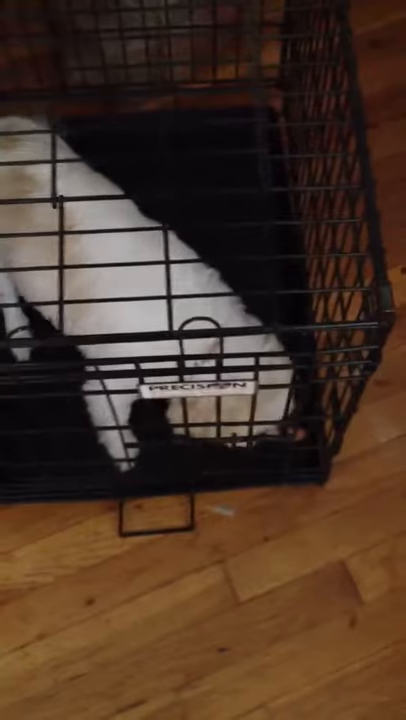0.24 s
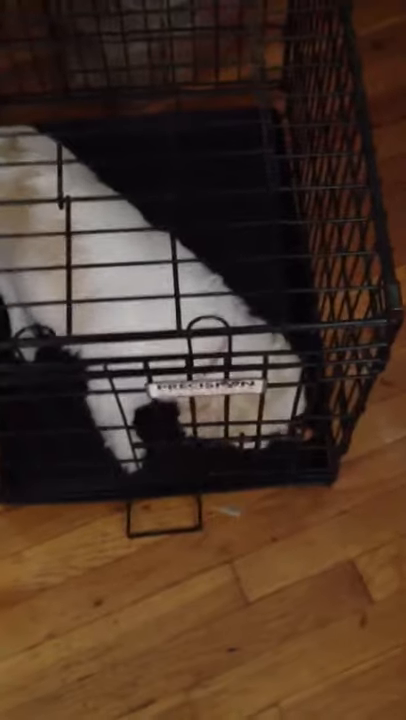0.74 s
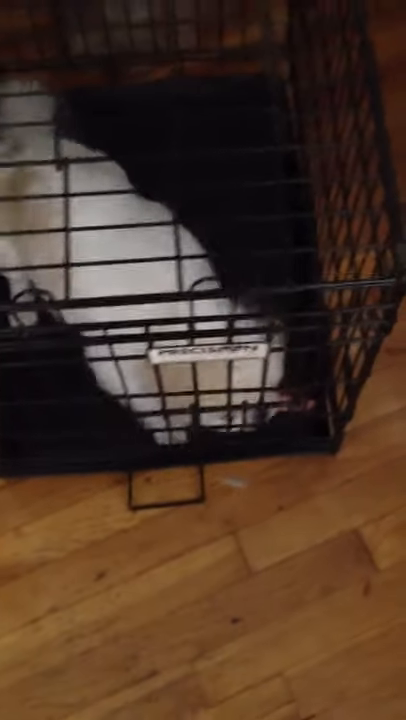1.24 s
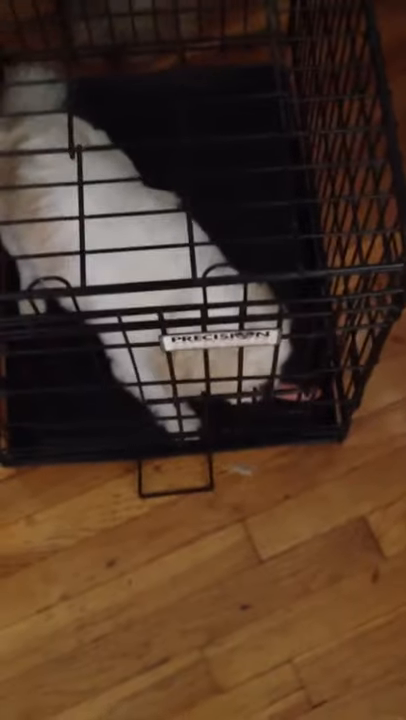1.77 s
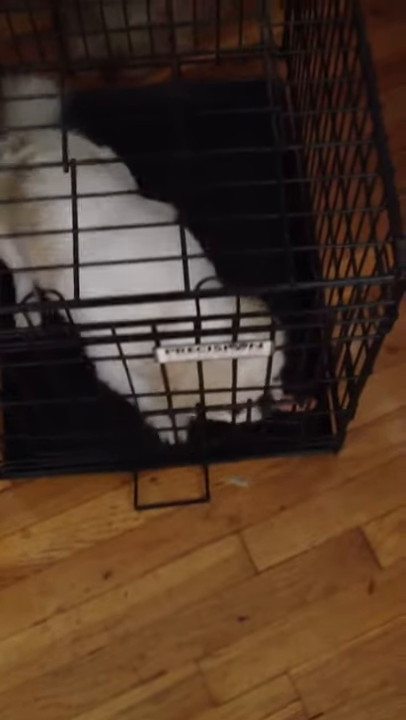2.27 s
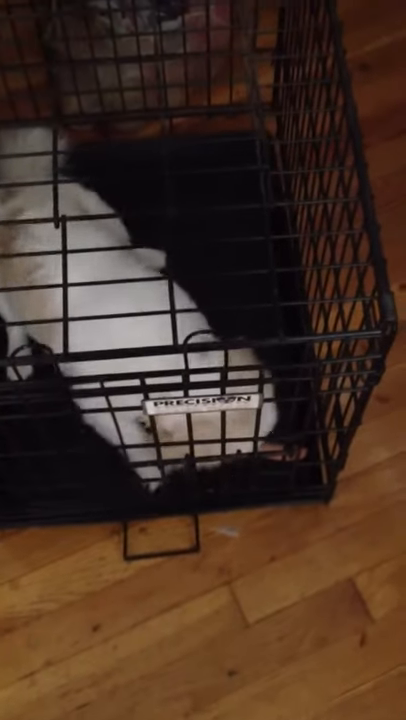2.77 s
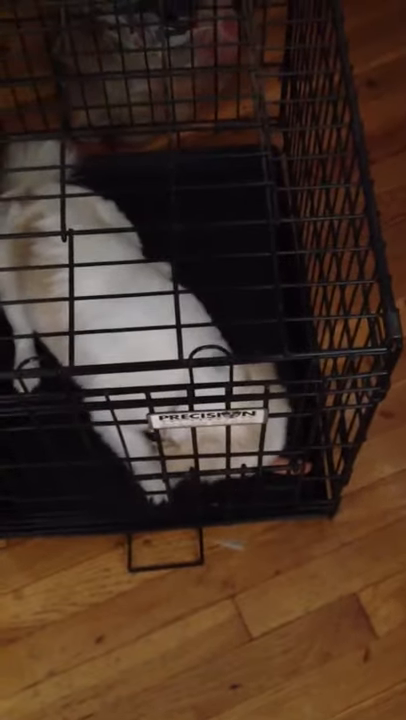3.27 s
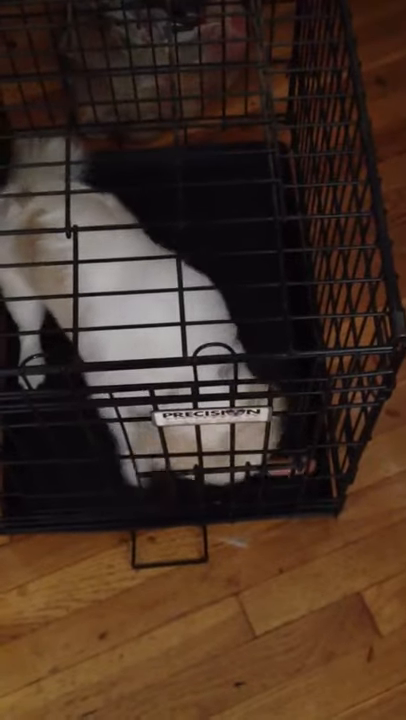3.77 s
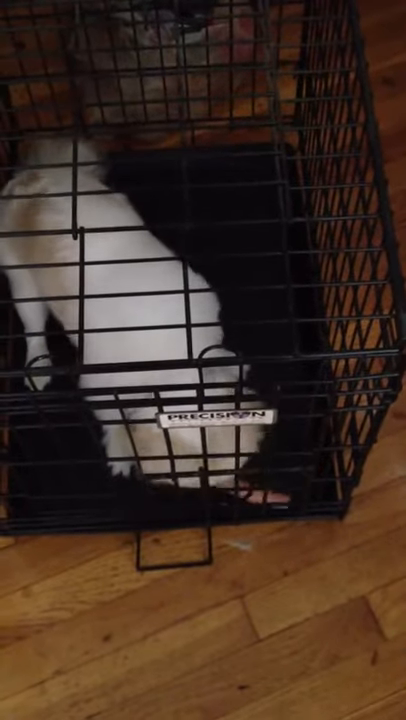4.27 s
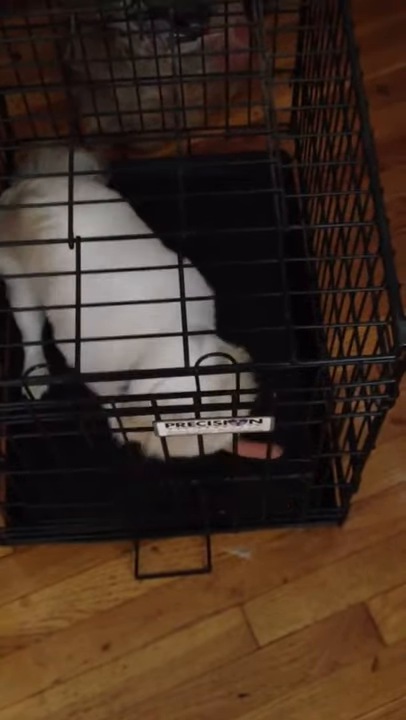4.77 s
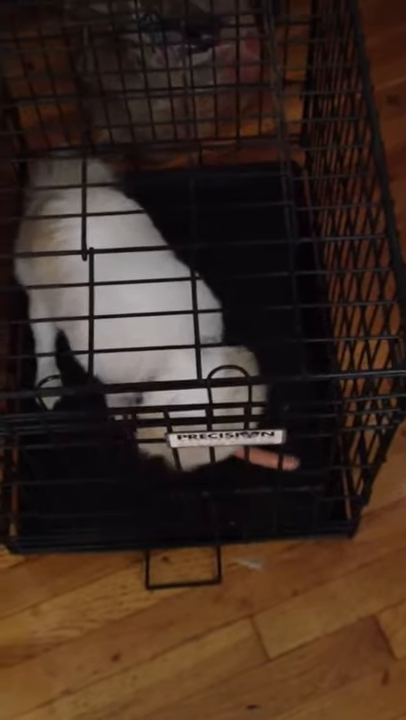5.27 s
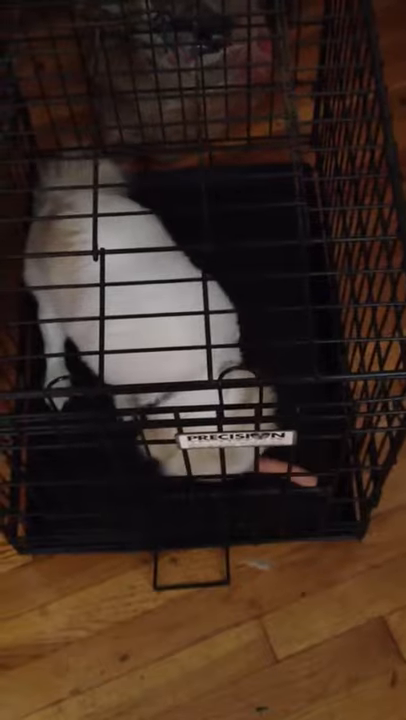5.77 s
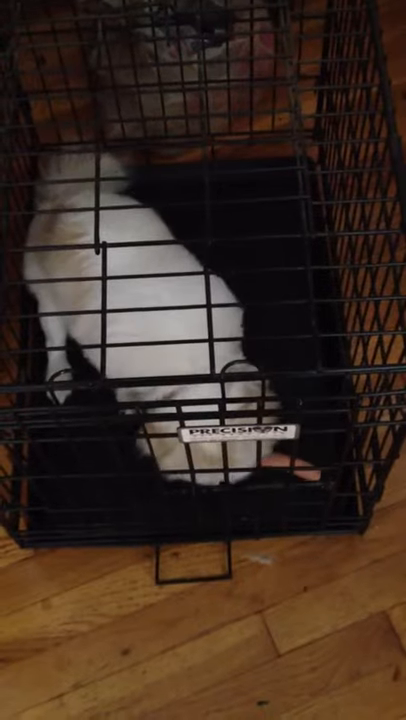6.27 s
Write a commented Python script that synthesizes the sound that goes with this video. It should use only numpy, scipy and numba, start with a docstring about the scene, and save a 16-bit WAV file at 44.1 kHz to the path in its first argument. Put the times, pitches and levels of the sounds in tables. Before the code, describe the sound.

A small dog guards a treat in a crate in a small, lively room, heard from a metre or two on a phone. A short hoarse rasp at 0 s leads into a wet, fluttering in-drawn snarl with throat rattle until about 0.8 s. A loud, harsh bark bursts at 0.95 s, with a weaker one at 1.15 s, trailing into rasps. A second hissing snarl runs from 1.6 to 2.1 s, then raw barks hit at 2.15 and 2.55 s with hoarse rasping between and after. A softer snarl at 2.9-3.4 s tightens into a low growl and a final strong bark at 3.6 s. Two crunches come around 3.9 s while the low growl pulses in surges until about 4.6 s. From 4.9 s to the end at 6.5 s there are only sparse, quiet bites, knocks and tooth ticks over faint room hush.

```python
"""A small dog guards a treat in a wire crate on a wooden floor, a metre or two from a phone.
It opens with a hoarse rasp and an in-drawn snarl: air past the teeth, a fluttering palate, a throat rattle.
Harsh barks follow, with rasps and snarls between: chaotic folds drive resonances that rise with the jaw.
Around the last bark a low growl of slack pulses surges; then bites crunch on jaw, teeth and tray.
A small room rings behind the dog, a faint hush lies under it all, and the phone limits the peaks."""
import sys
import numpy as np
from scipy import signal
from scipy.fft import rfft, irfft
from scipy.io import wavfile
from scipy.ndimage import uniform_filter1d, minimum_filter1d
from numba import njit

SR = 44100
rng = np.random.default_rng(int(sys.argv[2]) if len(sys.argv) > 2 else 0)


def generate_wav(signal):
    """Clip the signal to [-1, 1] and save it as 16-bit WAV at the path in sys.argv[1]."""
    frames = np.transpose(np.atleast_2d(signal))
    scaled = np.clip(frames, -1, 1) * 32767
    pcm = np.round(scaled).astype(np.int16)
    wavfile.write(sys.argv[1], SR, pcm)


N = 287091
T = np.arange(N) / SR
SLOW = np.arange(0, N / SR, .001)  # control clock [s]
GRID = np.fft.rfftfreq(8192, 1 / SR)  # filter frequencies [Hz]

# Barks, levels before the final trim; resonances with the jaw open, drifting about mid-hold:
# (start [s], jaw opening [s], jaw held open [s], level [dB], sag [dB/s], first resonance [Hz],
#  second [Hz], its drift [Hz/s], third [Hz], its drift [Hz/s], edge re mouth [dB], edge growth [dB/s],
#  hiss [dB], chest [dB], opening thump [dB])
BARKS = [ (0.952, 0.055, 0.045, -9, -12.5, 1317, 2020, -0.5, 3200, 1500.5, -11, -11.5, -31, -33, -27),
         (1.151, 0.11, 0.011, -18.5, 5, 1320, 1900, 0, 3030, 0, -4.5, -70, -34, -36.5, -65),
         (2.15, 0.034, 0.048, -9.5, 5, 1260, 2036, 3500.5, 3074, -7000, -12.5, 130.5, -32.5, -32, -30.5),
         (2.555, .058, 0.086, -13, 58.5, 1394, 2220, 10000, 3326, 5001, -10, 50.5, -33.5, -36.5, -45),
         (3.608, 0.058, 0.024, -8, 71, 1250, 1620, 0, 2915, -3, -22.5, -20.5, -34, -33.5, -31.5), ]
# Hoarse rasps around the barks, last three levels relative to the mouth:
# (start [s], length [s], level [dB], first resonance [Hz], second [Hz], third [Hz],
#  chest [dB], edge [dB], hiss [dB])
RASPS = [ (0.0, .03, -34, 710, 1863, 3370, -3.5, -7.5, -5.5),
         (0.099, .03, -49.5, 772, 1710, 3345, -4, -14, -5.5),
         (1.12, 0.062, -37, 1080, 1863, 2920, -28, 1, -8),
         (1.284, .09, -33.5, 790, 1856, 3230, -3, -13, -10),
         (1.383, .035, -47, 752, 1950, 3065, -0.5, -2, -7),
         (1.515, .05, -54, 1019, 1720, 3020, -5.5, -13, -10),
         (2.299, .11, -36, 868, 1760, 3100, -4, -8.5, -14.5),
         (2.42, .135, -36.5, 1037, 1710, 2933, -7, -10, -18),
         (2.78, .06, -51, 1350, 1680, 2900, -18, -14, -13),
         (3.473, 0.023, -49.5, 857, 1466, 2856, -3, -27, -24), ]
# Chest resonances: (frequency [Hz], width [Hz], level [dB])
CHEST = [(145, 10, -11.5), (224.3, 90, 1.5), (331, 120, 3.5), (551, 120, 4.5)]
# Air past the teeth: (frequency [Hz], width [Hz], level [dB])
BARK_HISS = [(7770, 2700, 1.5), (11700, 5300, -5)]


def barks():
    """Chaotic folds drive resonances that rise as the jaw opens; force widens them and adds edge and hiss."""
    gestures = [bark(*row) for row in BARKS] + [rasp(*row) for row in RASPS]
    loud, chesty, edgy, airy, first_hz, second_hz, third_hz = one_throat(gestures)
    force = np.clip(loud * undb(16), 0, 1)
    voice = folds(hz=145, jitter=.2, shimmer_db=2, air_db=1.5, puff=.7)
    scream = folds(hz=316, jitter=.06, shimmer_db=2.3, air_db=-6, puff=.4)
    # under force a second, tighter vibration joins the slow one
    strained = unit(voice) + force * undb(2.5) * unit(scream)

    gape = 1 + 0.79 * force  # an open mouth damps its resonances
    first = formant(strained, first_hz, width_hz=480 * gape)
    second = formant(strained, second_hz, width_hz=380 * gape)
    third = formant(strained, third_hz, width_hz=620 * gape)
    fourth = formant(strained, 1.42 * third_hz, width_hz=570)
    body = unit(resonate(strained, [(842, 200, 0)]))
    mouth = steady(first - undb(-1.0) * second + undb(-19.5) * body)

    chest = chesty * steady(resonate(voice, CHEST))
    edge = edgy * third + airy * undb(-6.0 + 6.1 * force) * fourth
    breath = unit(strained) + undb(1.5) * rng.standard_normal(N)
    hiss = airy * steady(resonate(breath, BARK_HISS))
    return undb(-2.5) * (loud * mouth + chest + edge + hiss)


VOICE_ATTACK_S, VOICE_RELEASE_S, BARK_TAIL_S = 0.0092, 0.074, 0.06  # the voice outlasts the open jaw
HISS_ATTACK_S, HISS_RELEASE_S = 0.031, 0.18
THUMP_S, THUMP_RELEASE_S = .02, .12  # the first push of air booms in the chest
# what shut jaws take from the mouth, and from the edge on top of that
JAW_CLOSE_S, MUFFLE_DB, EDGE_MUFFLE_DB = 0.03, 22, 7.5
# resonances with shut jaws, as shares of the open ones
SHUT_FIRST, SHUT_SECOND, SHUT_THIRD = 0.6, .9, 0.98


def bark(start, opening, hold, db, sag, first_hz, second_hz, second_drift, third_hz, third_drift,
         edge_db, growth, hiss_db, chest_db, thump_db):
    """The voice starts behind shut jaws; as they open it grows loud and bright and its resonances rise."""
    held = opening + hold
    still_shut = 1 - np.sin(np.pi / 2 * np.clip((SLOW - start) / opening, 0, 1))
    shut = still_shut + np.clip((SLOW - start - held) / JAW_CLOSE_S, 0, 1)
    age = np.clip(SLOW - start - opening, 0, hold) - hold / 2  # from mid-hold
    voiced = swell(start, held + BARK_TAIL_S, VOICE_ATTACK_S, VOICE_RELEASE_S)
    mouth = voiced * undb(db - sag * age - MUFFLE_DB * shut)
    thump = swell(start, THUMP_S, VOICE_ATTACK_S, THUMP_RELEASE_S) * undb(thump_db)
    chest = np.hypot(voiced * undb(chest_db), thump)
    edge = mouth * undb(edge_db + growth * age - EDGE_MUFFLE_DB * shut)
    hiss = swell(start, held, HISS_ATTACK_S, HISS_RELEASE_S) * undb(hiss_db - sag * age)
    first = first_hz * SHUT_FIRST ** shut
    second = (second_hz + second_drift * age) * SHUT_SECOND ** shut
    third = (third_hz + third_drift * age) * SHUT_THIRD ** shut
    return [mouth, chest, edge, hiss], [first, second, third]


def rasp(start, length, db, first_hz, second_hz, third_hz, chest_db, edge_db, hiss_db):
    """The same voice held at low effort, with the jaws still."""
    mouth = swell(start, length, VOICE_ATTACK_S, VOICE_RELEASE_S) * undb(db)
    levels = np.outer(undb([0, chest_db, edge_db, hiss_db]), mouth)
    return levels, np.outer([first_hz, second_hz, third_hz], np.ones(len(SLOW)))


# In-drawn snarls, levels before the layer weights and trim:
# (start [s], length [s], swell [s], teeth [dB], nose [dB], nose sag [dB/s], rattle [dB],
#  first resonance [Hz], its drift [Hz/s], second [Hz], third at the start [Hz], third with lips back [Hz])
SNARLS = [ (0.121, 0.65, 0.047, -42, -43, -7.5, -65.5, 953, -190, 2870, 3780, 4070),
          (1.574, 0.43, 0.027, -38.5, -40.5, 0, -68, 1222, -420, 2200, 3300, 4130),
          (2.88, 0.39, 0.095, -44, -46, 4, -75.5, 1297, 160, 2800, 3940, 3320), ]
# Palate flutter in the mouth, one list per snarl: (time [s], level [dB])
FLUTTERS = [
    [(0.11, -53.5), (0.276, -36), (0.298, -71), (0.308, -39.5), (0.538, -49.5), (0.668, -44.5),
     (0.904, -64.5), (0.93, -86)],
    [(1.57, -49.5), (1.606, -42), (1.618, -48.5), (1.814, -51), (1.91, -44), (1.934, -50.5), (2.094, -59),
     (2.14, -78)],
    [(2.88, -51.5), (2.93, -54.5), (2.97, -54), (2.984, -37.5), (3.164, -42), (3.26, -41.5), (3.266, -35),
     (3.42, -77)],
]
# The throat rattles when the dog pulls harder:
# (start [s], length [s], rattle [dB], hiss at the teeth [dB])
RATTLES = [(0.115, 0.66, -49.5, -58), (1.89, 0.026, -57, -54.5), (3.269, 0.022, -54, -45.5)]
RATTLE_ATTACK_S, RATTLE_RELEASE_S = 0.011, 0.12
# Throat resonances of the rattle: (frequency [Hz], width [Hz], level [dB])
SNARL_RATTLE = [(150, 27, 2), (225, 110, 1.5), (346, 77, -1), (533, 220, -4.5)]
# Fixed nose and teeth resonances, one list per snarl: (frequency [Hz], width [Hz], level [dB])
SNARL_NOSES = [
    [(2330, 350, -10), (6150, 600, -14), (8200, 1400, -7), (12300, 3200, -10)],
    [(3400, 700, -13), (6300, 600, -16), (8500, 1200, -21), (12400, 2200, -19)],
    [(4300, 550, -5.5), (5050, 400, -14), (7550, 500, -18), (9200, 800, -17.5), (12500, 3000, -25)],
]


def snarls():
    """Air drawn past bared teeth makes the soft palate flutter; lips and tongue move the resonances."""
    breaths = [snarl(*row) for row in SNARLS]
    _, bared, rattling, first_hz, second_hz, third_hz = one_throat(breaths)
    fluttering = 0
    for rows in FLUTTERS:
        times, db = np.transpose(rows)
        fluttering = fluttering + undb(np.interp(SLOW, times, db, left=-np.inf, right=-np.inf))
    fluttering = track(fluttering)
    for start, length, rattle_db, hiss_db in RATTLES:
        pull = track(swell(start, length, RATTLE_ATTACK_S, RATTLE_RELEASE_S))
        rattling = rattling + undb(rattle_db) * pull
        bared = np.hypot(bared, undb(hiss_db) * pull)

    flutter = folds(hz=115, jitter=.25, shimmer_db=1.8, air_db=10, puff=1.1)
    air = unit(unit(flutter) + rng.standard_normal(N))
    rattle = steady(resonate(flutter, SNARL_RATTLE), size=4000)
    mouth = formant(flutter, first_hz, width_hz=470)
    # neighbouring resonances swing in opposite phase, which deepens the valleys between them
    upper = undb(-4.5) * formant(air, third_hz, width_hz=650)
    teeth = upper - undb(-6.5) * formant(air, second_hz, width_hz=500)
    nose = 0
    for (levels, _), modes in zip(breaths, SNARL_NOSES):
        nose = nose + track(levels[0]) * levelled_resonances(air, modes)
    return undb(-0.65) * (fluttering * mouth + rattling * rattle + bared * teeth + nose)


SNARL_ATTACK_S, SNARL_RELEASE_S, LIPS_BACK_S = 0.011, 0.35, 0.054
SNARL_SWELL_DB, SNARL_SAG_DB_PER_S = 42, 4.5


def snarl(start, length, swell_s, teeth_db, nose_db, nose_sag, rattle_db,
          first_hz, drift, second_hz, from_hz, third_hz):
    """One in-breath: the teeth's hiss swells, then sags; the third resonance glides as lips draw back."""
    age = np.clip(SLOW - start, 0, length)
    past_middle = age - length / 2
    breath = swell(start, length, SNARL_ATTACK_S, SNARL_RELEASE_S)
    nose = breath * undb(nose_db - nose_sag * past_middle)
    not_swollen = np.maximum(1 - age / swell_s, 0)
    teeth = breath * undb(teeth_db - SNARL_SAG_DB_PER_S * past_middle - SNARL_SWELL_DB * not_swollen)
    lips_forward = 1 / (1 + (age / LIPS_BACK_S) ** 6)
    second = np.full(len(SLOW), float(second_hz))
    third = third_hz + (from_hz - third_hz) * lips_forward
    return [nose, teeth, breath * undb(rattle_db)], [first_hz + drift * age, second, third]


# Surges of the closed-mouth growl, before the trim: (start [s], length [s], level [dB])
SURGES = [(3.47, 0.013, -46.5), (3.511, 0.027, -45), (3.555, 0.023, -43), (3.592, 0.008, -40),
          (3.853, .025, -45.5), (3.977, 0.012, -38), (4.024, 0.0096, -42), (4.13, 0.014, -44.5),
          (4.176, 0.021, -48), (4.221, 0.02, -41), (4.266, 0.015, -39), (4.317, 0.027, -39.5),
          (4.367, 0.028, -46.5), (4.409, 0.029, -45.5), (4.469, 0.026, -46.5), (4.518, 0.027, -42.5),
          (4.575, 0.043, -54)]
SURGE_ATTACK_S, SURGE_RELEASE_S = 0.0034, 0.073
# Lip movement: (time [s], mouth resonance [Hz], mouth level [dB], nose level [dB])
GROWL_LIPS = [(3.47, 750, -1, 0), (3.6, 785, -1, 3.5), (3.87, 780, -9.5, 0), (4.1, 740, -18, -13.5),
              (4.19, 708, -21, -19), (4.235, 720, -6, -7), (4.43, 740, -2, -1), (4.55, 799, -13.5, -10),
              (4.63, 950, 1.5, -1)]
# Throat resonances: (frequency [Hz], width [Hz], level [dB])
GROWL_THROAT = [(150, 30, -18.5), (219.7, 57, 4.5), (340.7, 61, 7), (520, 37, -2)]
# Nose resonances, before the nose level: (frequency [Hz], width [Hz], level [dB])
GROWL_NOSE = [(1416, 160, -21.5), (4480, 468, -24.5), (8330, 1700, -19)]


def growls():
    """Slow, slack pulses behind nearly closed lips, coming in surges."""
    surges = [undb(db) * swell(start, length, SURGE_ATTACK_S, SURGE_RELEASE_S)
              for start, length, db in SURGES]
    effort = track(sum(surges))
    times, *lips = np.transpose(GROWL_LIPS)
    mouth_hz, mouth_db, nose_db = (np.interp(T, times, column) for column in lips)
    voice = folds(hz=82, jitter=.16, shimmer_db=2, air_db=-8, puff=.5)
    throat = steady(resonate(voice, GROWL_THROAT))
    mouth = undb(mouth_db) * formant(voice, mouth_hz, width_hz=230)
    nose = undb(nose_db) * levelled_resonances(voice, GROWL_NOSE)
    return effort * undb(-3.0) * (throat + mouth + nose)


# Bites, smacks and nudges of the treat:
# (time [s], knock level [dB], thud level [dB], tick level [dB], 60 dB decay [s])
BITES = [(3.9, -41, -49, -47.5, 0.14), (3.953, -36, -66, -68, 0.064), (4.932, -53, -70, -50.5, 0.097),
         (4.992, -52.5, -72.5, -86, .1), (5.037, -48, -71, -80, 0.06), (5.085, -64.5, -82, -84, 0.31),
         (5.341, -59, -80, -63, 0.041), (5.472, -69, -75, -63, 0.032), (5.481, -54.5, -60, -71, 0.11),
         (5.655, -71, -78.5, -66, 0.036), (5.857, -43.5, -57, -60, 0.11), (6.073, -58.5, -80.5, -79, .05),
         (6.325, -47.5, -53, -64.5, 0.086), (6.424, -70, -53, -70.5, 0.11),
         (6.485, -54.5, -59, -66.5, 0.058)]
# Jaw resonances: (frequency [Hz], width [Hz], level [dB])
JAW = [(646.3, 77, 5.5), (807, 38, 5), (1250, 560, -5), (1680, 390, -9), (2640, 440, -15)]
# Tooth tick resonances, levels relative to each other: (frequency [Hz], width [Hz], level [dB])
TICK = [(3200, 1100, 22), (6000, 4700, 18.5), (12000, 18000, 9)]


def bites():
    """Each bite is a short crunch that rings the jaw, ticks on the teeth and thuds on the tray."""
    knock, thud, tick = np.zeros((3, N))
    for start, knock_db, thud_db, tick_db, t60 in BITES:
        fade = (T >= start) * decay(np.abs(T - start) / t60)
        knock += undb(knock_db) * fade
        thud += undb(thud_db) * fade
        tick += undb(tick_db) * fade
    crunch = rng.standard_normal(N) * undb(1.1 * rng.standard_normal(N))
    jaw = steady(resonate(crunch, JAW))
    tray = steady(resonate(crunch, [(222, 77, 0)]))
    teeth = unit(resonate(crunch, TICK))
    return knock * jaw + thud * tray + tick * teeth


# First reflections off tray, floor and walls, re direct sound: (delay [s], level [dB])
ECHOES = [(.0009, -13), (.00217, -4.5), (.00295, -8.5), (.007, -9.5), (.0093, -8.5)]
# Standing waves of room and crate, peaks and notches: (frequency [Hz], width [Hz], level [dB])
STANDING = [(170, 16, -12), (180.6, 11, 1.5), (221, 32, 0.5), (248, 10, -1.5), (314, 5.5, -4),
            (368.2, 16, 8.5), (402, 11, -6.5), (442, 40, 7.5), (522, 23, -3), (493, 44, -1.5),
            (540.8, 38, 6), (581, 14, -1), (625, 24, -6.5), (719.7, 20, 8), (786, 14, 3), (864, 13, 7.5),
            (920, 2, -8), (1013, 6.9, 7), (1167, 31, -9), (1546, 15, -1.5), (1760, 14, 0.5),
            (1832, 80, -12.5), (1882, 52, 9.5), (1850, 27, -3.5), (2460, 41, -3), (2764, 14, -9.5),
            (2980, 110, -4.5), (3300, 20, -3.5)]
ROOM_T60_S, TREBLE_T60_S, ROOM_DB = 0.3, 0.23, -4.5  # dense echoes, level re direct sound


def room(x):
    """First reflections, then dense echoes whose treble dies first; standing waves colour the low end."""
    t = T[:SR // 2]
    noise = rng.standard_normal(len(t))
    low = signal.sosfilt(signal.butter(2, 2500, fs=SR, output="sos"), noise)
    high = signal.sosfilt(signal.butter(2, 2500, "high", fs=SR, output="sos"), noise)
    tail = (low * decay(t / ROOM_T60_S) - high * decay(t / TREBLE_T60_S)) * (t > .003)
    response = (t == 0) + undb(ROOM_DB) * tail / np.linalg.norm(tail)
    for delay, db in ECHOES:
        response[int(delay * SR)] += undb(db)
    response /= np.linalg.norm(response)
    # below about 2 kHz the standing waves take the place of the echoes' own ripple
    smooth_power = uniform_filter1d(np.abs(rfft(response)) ** 2, size=30)
    power = np.interp(GRID, np.fft.rfftfreq(len(t), 1 / SR), smooth_power)
    even = power ** (-.5 / (1 + (GRID / 2200) ** 4))
    standing = undb(sum(db * bell(hz, width) for hz, width, db in STANDING))
    return undb(1.0) * colour(signal.fftconvolve(x, response)[:N], even * standing)


# Spectrum shape of the hush, before the overall level: (frequency [Hz], density [dB per Hz])
QUIET = [(18, -58), (30, -26.5), (55, -18), (228, -1), (355, -9), (437, -10), (735, -10), (859, -9),
         (1520, -12.5), (1780, -14), (8040, -19), (9890, -23.5), (15000, -18)]
QUIET_DB = -68.5  # rms before the phone


def quiet():
    """The faint hush of the house and the microphone's own hiss, as one shaped noise."""
    hz, db = np.transpose(QUIET)
    shape = undb(np.interp(np.log(GRID + 1), np.log(hz), db))
    return undb(QUIET_DB) * unit(colour(rng.standard_normal(N), shape))


def folds(hz, jitter, shimmer_db, air_db, puff, count=4000):
    """Tissue slaps shut at uneven intervals; a puff of turbulent air (decay in cycles) follows each slap."""
    chance = rng.standard_normal((count, 2))
    times = np.cumsum(np.exp(jitter * chance[:, 0]) / hz)
    sizes = undb(shimmer_db * chance[:, 1])
    cycle = np.interp(T, times, np.arange(count))
    size = sizes[cycle.astype(int)]
    slaps = np.diff(np.floor(cycle), prepend=0) * size
    air = size * np.exp(-(cycle % 1) / puff) * rng.standard_normal(N)
    return unit(slaps) + undb(air_db) * unit(air)


def one_throat(gestures):
    """Join (levels, resonances) of gestures: powers add, and the loudest dominates the resonances."""
    levels, hz = (np.array(part) for part in zip(*gestures))
    weight = levels[:, :1] ** 2 + 1e-18
    joined_levels = np.sqrt(np.sum(levels ** 2, axis=0))
    joined_hz = np.sum(weight * hz, axis=0) / np.sum(weight, axis=0)
    return [track(control) for control in (*joined_levels, *joined_hz)]


def swell(start, length, attack_s, release_s):
    """Envelope on the SLOW clock: rise, hold until the length is over, fall 60 dB in the release time."""
    rise = np.clip((SLOW - start) / attack_s, 0, 1)
    return rise * decay(np.clip((SLOW - start - length) / release_s, 0, 2))


def decay(age):
    """Exponential fall of 60 dB per unit of age."""
    return np.exp(-np.log(1000) * age)


def track(values):
    """A control from the SLOW clock at every sample."""
    return np.interp(T, SLOW, values)


def formant(x, hz, width_hz):
    """A moving resonance with steep skirts from two equal band-passes, held near rms 1."""
    width = width_hz * np.ones(N)
    return steady(svf(svf(x, hz, width), hz, width), size=2400)


@njit
def svf(x, hz, width):
    """State-variable band-pass whose centre and width move every sample."""
    y, band, low = np.empty(len(x)), 0., 0.
    for i in range(len(x)):
        g, k = np.tan(np.pi * hz[i] / SR), width[i] / hz[i]
        v = (band + g * (x[i] - low)) / (1 + g * (g + k))
        band, low, y[i] = 2 * v - band, low + 2 * g * v, k * v
    return y


def levelled_resonances(x, modes):
    """Fixed resonances, each at its own rms level."""
    return sum(undb(db) * unit(colour(x, bell(hz, width))) for hz, width, db in modes)


def resonate(x, modes):
    """Pass a sound through fixed resonances whose powers add."""
    return colour(x, np.sqrt(sum((undb(db) * bell(hz, width)) ** 2 for hz, width, db in modes)))


def bell(hz, width):
    """Gain of a steep resonance on GRID."""
    return 1 / (1 + ((GRID - hz) * (GRID + hz) / (1.225 * width * (GRID + 1))) ** 2)


def colour(x, gain):
    """Causal minimum-phase filter with the given gain on GRID."""
    cepstrum = irfft(np.log(gain + 1e-6))
    half = len(cepstrum) // 2
    # folding the cepstrum forward makes the response causal
    cepstrum[1:half] *= 2
    cepstrum[half + 1:] = 0
    return signal.fftconvolve(x, irfft(np.exp(rfft(cepstrum)))[:half])[:len(x)]


def steady(x, size=1800):
    """Hold the running rms near 1 over size samples, leaving single pulses uneven."""
    return x / np.sqrt(uniform_filter1d(x ** 2, size) + 1e-18)


def unit(x):
    """Scale to rms 1."""
    return x / np.sqrt(np.mean(x ** 2))


def undb(db):
    """Decibels to gain."""
    return 10 ** (np.asarray(db) / 20)


def scene():
    """The dog in its room, over the quiet."""
    dog = barks() + snarls() + growls() + bites()
    return (room(dog) + quiet())[None]


def record(dry):
    """The phone cuts the bass, limits the peaks, bends them a little unevenly and cuts the top."""
    x = signal.sosfilt(signal.butter(6, 130, "high", fs=SR, output="sos"), dry)
    gain = np.minimum(1, .72 / (np.abs(x) + 1e-9))
    x = x * uniform_filter1d(minimum_filter1d(gain, size=70), size=70)
    bent = x + .005 * x ** 2
    return signal.sosfilt(signal.ellip(10, .2, 80, 15500, fs=SR, output="sos"), bent)


dry = scene()
out = record(dry)
generate_wav(out)
```